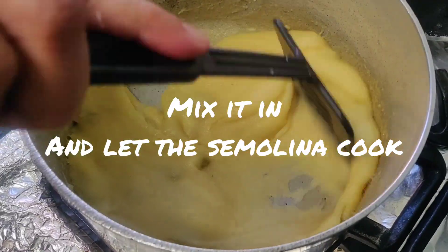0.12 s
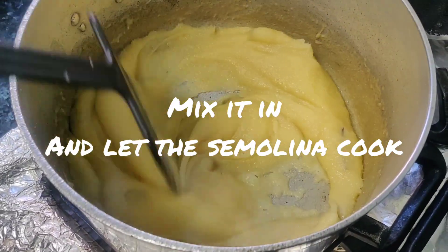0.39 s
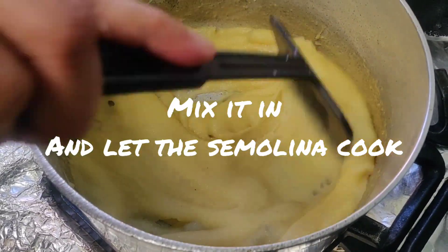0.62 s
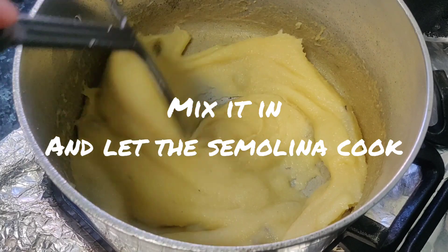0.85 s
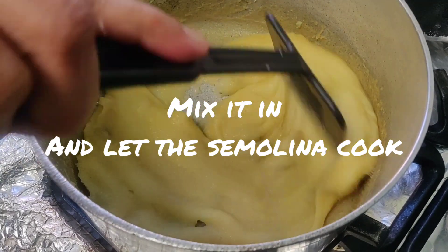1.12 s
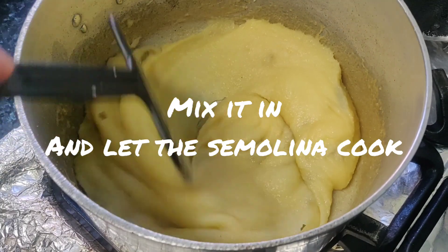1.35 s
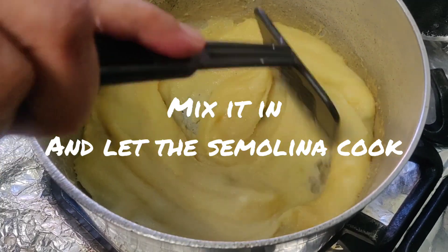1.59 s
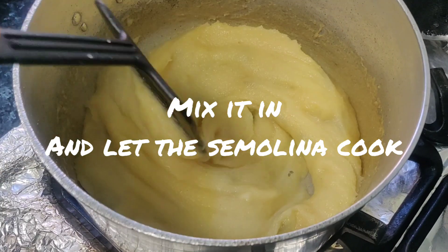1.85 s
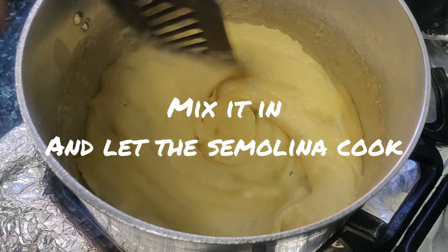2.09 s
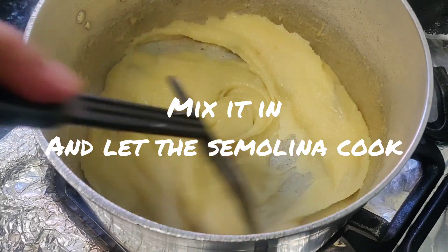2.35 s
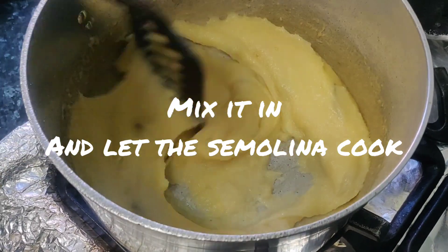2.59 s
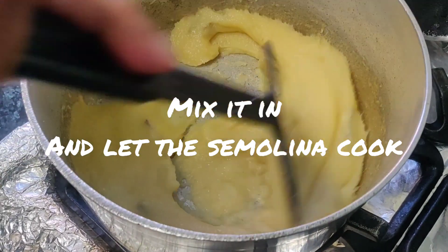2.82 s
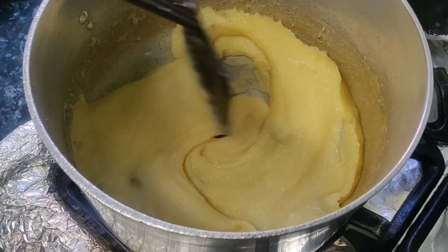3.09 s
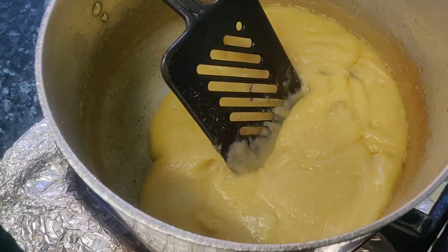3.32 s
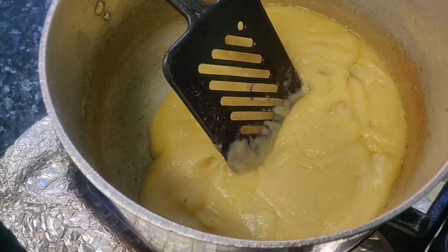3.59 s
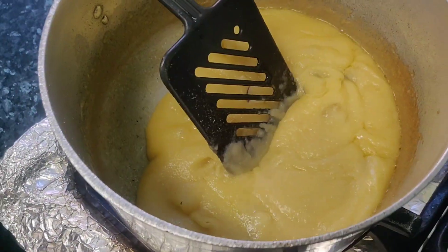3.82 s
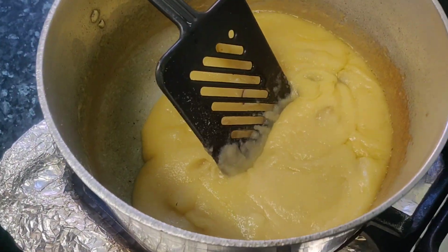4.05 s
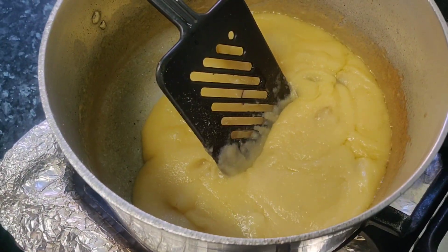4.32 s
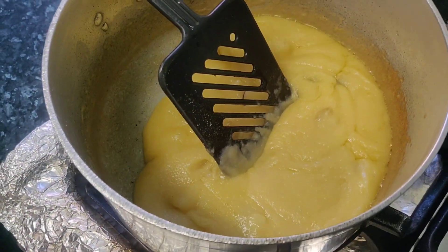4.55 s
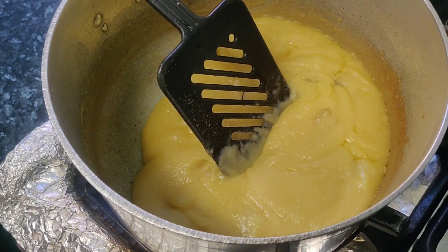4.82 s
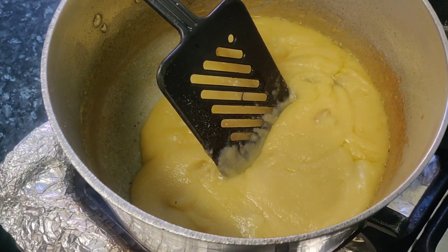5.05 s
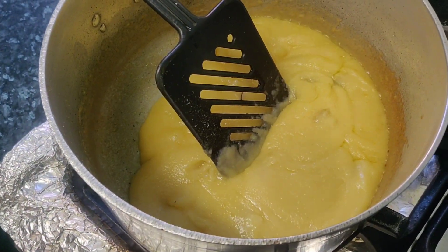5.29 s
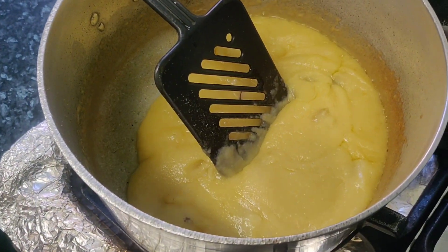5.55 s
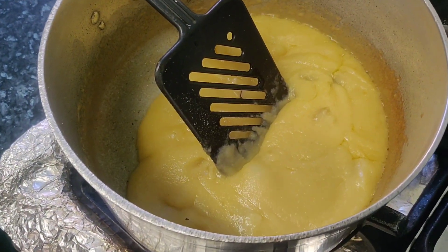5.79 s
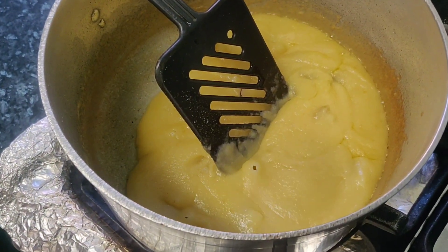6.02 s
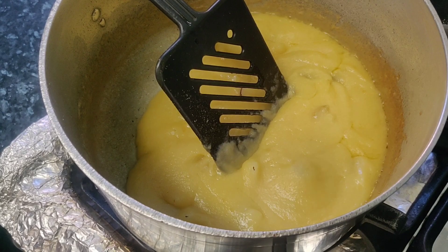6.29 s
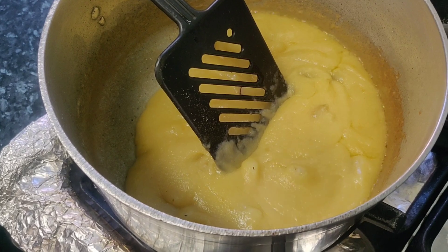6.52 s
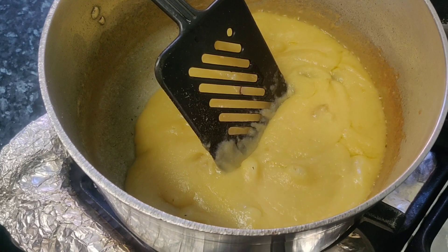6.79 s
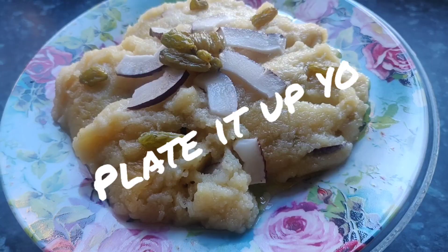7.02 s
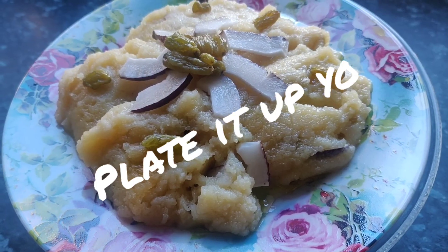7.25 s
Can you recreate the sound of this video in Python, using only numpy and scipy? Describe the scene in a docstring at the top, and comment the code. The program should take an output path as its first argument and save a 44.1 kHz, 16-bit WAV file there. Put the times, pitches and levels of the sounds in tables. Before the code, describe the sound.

A handheld phone close to a steel pot hears low, resonant burner roar, hum and crackling sizzle from the start. Spatula strokes rasp and rumble along the metal with dull, paste-damped knocks and one hard ringing hit. After a momentary break, simmering fades up without stirring: steady hiss, scattered snaps, deeper blister bursts, low flutter on the left and soft thumps. Another break leads to very faint room noise. Small dry kitchen.

```python
"""From the outset a gas burner roars over a mains hum, filtered noise and sines, while pudding hisses and spits.
A plastic spatula stirs: its knocks and stick-slip scrapes excite the modes of a steel pot.
After a brief silence the pudding simmers alone, its noise and steam jets rising from silence; bumps reach the phone.
Last comes a quiet room, low noise with faint sines, again rising from silence.
Two unlike microphone ports colour it all; in the simmer and the quiet room their offset jumps and settles."""
import sys
import numpy as np
from scipy import signal
from scipy.fft import rfft, irfft
from scipy.io import wavfile

SR = 44100
rng = np.random.default_rng(int(sys.argv[2]) if len(sys.argv) > 2 else 0)


def wav_out(sig):
    """Save sig, one row per channel (or a flat mono array), as 16-bit PCM at SR to the path in sys.argv[1]."""
    wavfile.write(sys.argv[1], SR, np.round(np.clip(np.atleast_2d(sig).T, -1, 1) * 32767).astype(np.int16))


def voltage_ratio(decibels):
    """Convert decibels (scalar or array-like) to amplitude ratios, 20 dB per decade."""
    exponent = np.asarray(decibels, float) / 20
    return 10 ** exponent


N = 325878
T = np.arange(N) / SR  # seconds
HZ = np.maximum(np.fft.rfftfreq(N, 1 / SR), 1)

# Source levels below hold before the passage fades and the colour of the ports.
# Stirring, simmer and quiet room. Each row: start in seconds, end in seconds.
PASSAGES = [(-2.5, 3.328), (3.412, 6.893), (6.97, 7.6)]
# Smooth spectrum of burner and kitchen. Each row: frequency in Hz, density in dB per Hz.
ROAR_SPECTRUM = [(25, -63), (60, -75), (130, -68.5), (250, -73.5), (420, -87), (480, -75), (700, -73.5),
                 (1000, -78), (1700, -80.5), (3000, -89), (6000, -105)]
# Resonances of pot and kitchen that the roar keeps ringing.
# Each row: frequency in Hz, width at -6 dB in Hz, density at the centre in dB per Hz.
ROAR_RESONANCES = [(149.8, 6.8, -60.5), (277, 19, -63), (325.6, 28.8, -55.5), (367.4, 15.2, -51),
                   (410.4, 36, -63), (627, 140, -75), (807, 20, -75.5), (1297, 18, -72), (1364, 120, -75),
                   (2006, 89, -74.5)]
# Mains harmonics. Each row: frequency in Hz, level in dB rms.
MAINS_HUM = [(100.2, -47), (200.4, -48.5)]
# Correlation of left and right in the roar. Each row: frequency in Hz, correlation from 0 to 1.
ROAR_CORRELATION = [(60, 0.8), (130, 0.9), (290, 0.97), (640, 0.63), (1410, 0), (3100, 0), (6820, 0),
                    (15000, 0.08)]
# Loud spits of steam. Each row: instant in seconds, peak in dB before panning and room,
# length in ms before filtering.
LOUD_SPITS = [(0.0056, -19, 2.4), (0.0753, -28, 1.4), (0.2484, -19, 0.78), (0.3739, -20, 1.1),
              (0.3776, -24, 2.4), (0.4361, -25, 1.5), (0.613, -26, 1.1), (0.64, -18, 2.5),
              (0.6595, -23, 1.5), (0.7072, -22, 2.1), (0.8321, -17, 1.2), (1.7726, -23, 1.3),
              (2.1587, -35.5, 1.4), (2.1649, -19, 1.1), (2.1752, -15.5, 1.4), (2.1816, -17.5, 0.9),
              (2.1896, -23.5, 1.2), (2.222, -25.5, 1.0), (2.1994, -21.5, 0.85), (2.2074, -20, 1.6),
              (2.2481, -22, 1.2), (2.4902, -22, 1.3), (2.6669, -22, 1.3), (2.9156, -26.5, 1.9),
              (3.1903, -20.5, 1.2), (3.2994, -29.5, 2), (3.3081, -22, 0.84), (3.6369, -23, 1.4),
              (3.6816, -28, 1.9), (4.1107, -26, 1.6), (4.1772, -28.5, 2.7), (4.2963, -14.5, 0.77),
              (4.4068, -28, 3.8), (4.5637, -21, 1.3), (4.9115, -26.5, 2.6), (5.1379, -26, 1.1),
              (5.3884, -28.5, 0.7), (5.3946, -21, 0.7), (5.4997, -26.5, 1.9), (5.6344, -37, 0.6),
              (5.8627, -28.5, 2.5), (5.8835, -21, 1.6)]
# Bigger blisters that burst with a deeper body. Each row: the same three columns as the loud spits.
BLISTERS = [(3.8535, -26.5, 3.1), (4.2165, -29.5, 1.5), (4.6651, -22.5, 1.5), (4.6731, -25, 2.4),
            (4.8968, -27.5, 1.5)]
# Spatter where the hot steel is bared. Each row: centre in seconds, level in dB before filtering,
# half length (standard deviation) in seconds.
SPATTER_SWELLS = [(.25, -39.5, 0.0072), (.378, -36, 0.0053), (.43, -35, 0.023), (.63, -40, 0.021),
                  (.84, -40.5, 0.07), (1.3, -39.5, 0.054), (1.79, -41, 0.034), (2.183, -26.5, 0.024),
                  (2.72, -40.5, 0.12), (3.2, -43, 0.087), (4.22, -38, 0.013), (4.67, -38.5, 0.01),
                  (4.91, -53, 0.022), (5.875, -48, 0.016)]
# Modes of the steel pot. Each row: frequency in Hz, relative level in dB, undamped t60 in seconds.
POT_MODES = [(463, -11, 0.1), (616, -2, 0.043), (671.3, 1, 0.05), (806, -5.5, 0.064), (880, -12.5, 0.053),
             (1247, -6.5, 0.14), (1370, -25.5, 0.061), (1744, -14, 0.22), (1898, -2.5, 0.045),
             (1948, -10.5, 0.14), (2080, -12, 0.056), (2660, -14, 0.06), (3740, -7, 0.078),
             (3940, -14.5, .1), (4104, -5, 0.045), (4870, -18.5, 0.09), (6230, -19, .06),
             (6610, -18, 0.043), (7650, -10, 0.12)]
# Knocks of the spatula. Each row: instant in seconds, peak in dB before the room,
# push length (four standard deviations) in ms, t60 in seconds that the paste under the blade allows.
KNOCKS = [(.538, -27, 2.8, 0.024), (.6383, -18, 1.05, 0.016), (1.3622, -25, 0.72, .03),
          (1.3875, -26, 0.97, .03), (1.484, -7, 0.023, 0.21), (1.4935, -21, 3.2, .04),
          (1.5605, -21, 1.5, 0.017), (1.828, -26.5, 0.77, 0.04), (2.0285, -26, 0.23, 0.28),
          (2.0425, -37, 0.9, 0.046), (2.061, -27.5, 1.4, 0.054), (2.133, -24, 3.1, .04),
          (2.4885, -25, 1.3, 0.037), (2.7195, -25.5, 0.48, 0.034), (3.1965, -26, 0.46, 0.063),
          (3.207, -25.5, 0.49, 0.048)]
# Strokes of the blade along the steel. Each row: centre in seconds, level of the rumble in dB,
# half length (standard deviation) in seconds.
STROKES = [(.584, -47, 0.18), (.91, -45, 0.059), (1.2, -46.5, 0.053), (1.524, -35.5, 0.039),
           (2.042, -35.5, 0.016), (2.07, -44, 0.013), (2.14, -40.5, 0.054), (2.418, -43, 0.015),
           (2.735, -39, 0.054), (3.225, -42, 0.025)]
# Soft bumps on the phone. Each row: instant in seconds, left amplitude, right amplitude.
PHONE_BUMPS = [(3.285, 0.039, -0.041), (4.531, 0.082, -.011), (4.655, 0.025, -0.016),
               (5.393, 0.095, 0.0092), (6.844, 0.07, -0.043)]
# Microphone offset waking up.
# Each row: start in seconds, scale of left swing, scale of right step, right settling time in seconds.
OFFSET_WAKES = [(3.629, 0.16, 0.046, 0.03), (7.151, 0.082, 0.025, 0.13)]
# Small sudden offset steps. Each row: start in seconds, left scale, right scale.
OFFSET_STEPS = [(3.632, -.015, 0), (7.1505, -.0035, 0), (7.2062, -.007, -.003)]
# Spectrum of the quiet room. Each row: frequency in Hz, density in dB per Hz.
QUIET_SPECTRUM = [(30, -76), (70, -77.5), (170, -85), (450, -86.5), (1000, -94), (1600, -96.5),
                  (3200, -100), (6000, -109), (16000, -106)]
# Faint steady tones of the quiet room. Each row: frequency in Hz, level in dB rms.
QUIET_TONES = [(166.9, -66.5), (1581, -73.5), (1857, -74.5)]
# Colour of the two ports. Each row: frequency in Hz, left gain in dB, right gain in dB.
PORT_COLOUR = [(60.7, -1.5, -4), (187, 0.45, 3.5), (378, 1.34, -1.2), (1320, -0.73, 1.5), (3300, 0.5, -1),
               (4280, 4, 4), (4800, 3.5, 3), (5280, 6.5, -0.5), (6540, 14.5, 6.5), (7510, 4.5, 0.5),
               (8330, -5.5, 8.5), (9300, -20, 6), (9920, -46.5, -12.5), (10400, -50, -39),
               (10600, -31.5, -19), (12400, -19, -7.5), (13700, -16, -7), (15500, -8.5, -4.5)]

STIR_END = PASSAGES[0][1]
SIMMER_START, SIMMER_END = PASSAGES[1]


def along(table, column=1):
    """Spectral interpolation: reads a table column on a log-frequency axis."""
    rows = np.array(table)
    return np.interp(np.log(HZ), np.log(rows[:, 0]), rows[:, column])


def noise(gain, correlation):
    """Partial correlation: stereo noise of a given gain per root Hz from a shared and an opposed part."""
    mid, side = rfft(rng.standard_normal((2, N))) * gain * np.sqrt(SR / 2)
    mid = mid * np.sqrt((1 + correlation) / 2)
    side = side * np.sqrt((1 - correlation) / 2)
    return irfft(np.array([mid + side, mid - side]), N)


def tones(table):
    """Superposition: steady sines add, from rows of Hz and dB rms."""
    return sum(voltage_ratio(db) * np.sqrt(2) * np.sin(2 * np.pi * hz * T) for hz, db in table)


def band(x, lo_hz, hi_hz):
    """Band limitation by a causal Butterworth filter."""
    return signal.sosfilt(signal.butter(2, [lo_hz, hi_hz], "bandpass", fs=SR, output="sos"), x)


def walk(rate_hz):
    """Slow random fluctuation: low-passed noise of standard deviation 1."""
    x = irfft(rfft(rng.standard_normal(N)) / (1 + (HZ / rate_hz) ** 2), N)
    return x / x.std()


def crackle(rate_hz, spread_db):
    """Random impulses: most clicks small, a few large, their size bounded; rms 1."""
    size = np.minimum(rng.exponential(size=N), 4)
    struck = rng.random(N) < rate_hz / SR
    x = struck * rng.standard_normal(N) * voltage_ratio(spread_db * size)
    return x / x.std()


def humps(table):
    """Gaussian envelopes: swells from rows of centre, dB and half length."""
    return sum(voltage_ratio(db) * np.exp(-.5 * ((T - s) / half) ** 2) for s, db, half in table)


def decay(t, t60):
    """Exponential damping: the amplitude falls by 60 dB in t60 seconds."""
    return np.exp(-np.log(1000) * t / t60)


def kitchen(x, t60, wet_db):
    """Reverberation: direct sound, a little late on the right, plus an unrelated decaying tail in each ear."""
    size, right_lag = 12000, 3  # samples
    tail = rng.standard_normal((2, size)) * decay(T[:size], t60)
    tail = voltage_ratio(wet_db) * tail / np.sqrt(np.sum(tail ** 2, axis=1, keepdims=True))
    x = x * np.ones((2, 1))
    direct = np.array([x[0], np.roll(x[1], right_lag)])
    return direct + signal.fftconvolve(x, tail, axes=1)[:, :N]


def fade(passage, rise_s=0.59, bend=0.77):
    """Exponential approach: the gain rises slowly from the start and is cut quickly at the end."""
    start, end = passage
    rise = (1 - np.exp(-np.clip(T - start, 0, None) / rise_s)) ** bend
    return rise * np.clip((end - T) / 0.008 + 1, 0, 1) ** 2


def stove():
    """Resonant filtering: turbulent roar excites narrow resonances, over two mains harmonics."""
    power = voltage_ratio(along(ROAR_SPECTRUM)) ** 2
    for hz, width, db in ROAR_RESONANCES:
        power += voltage_ratio(db) ** 2 / (1 + (2 * (HZ - hz) / width) ** 2) ** 2
    roar = noise(np.sqrt(power), np.clip(along(ROAR_CORRELATION), 0, 1))
    return roar * voltage_ratio(.8 * walk(7.)) + tones(MAINS_HUM)


def pudding_hiss():
    """Fluctuating noise: fine hiss joined by fizzing grains, growing a little as the simmer thickens."""
    stirred_db, simmer_db, growth_db_per_s = -41.5, -43, 0.09  # before filtering
    simmer_level = simmer_db + growth_db_per_s * (T - SIMMER_START)
    level_db = np.where(T < SIMMER_START, stirred_db, simmer_level)
    fizz = np.array([crackle(1000.0, 4.9), crackle(1300.0, 1.5)])
    hiss = rng.standard_normal((2, N)) * voltage_ratio(1.58 * walk(17.0)) + voltage_ratio(-5.5) * fizz
    return band(hiss * voltage_ratio(level_db), 1400.0, 18000.)


def arm_shake():
    """Vibration transfer: a deep, wavering shake lasts while the arm stirs."""
    shake = voltage_ratio(-19.0) * band(rng.standard_normal(N), 8.2, 49.0)
    return shake * voltage_ratio(3.1 * walk(3.)) * (T < STIR_END)


def steam_spits():
    """Impulsive radiation: the skin snaps amid a brief jet of steam, heard partly differently at each port."""
    # small spits fall at random throughout stirring and simmer
    count, small_db, spread_db, small_ms = 110, -39, 1.5, 1.1
    when, size, long = rng.random((count, 3)).T
    small = zip(when * SIMMER_END, small_db - spread_db * np.log(size), small_ms * (.5 + long))
    instant, peak_db, ms = np.array(list(BLISTERS) + list(LOUD_SPITS) + list(small)).T
    lead = 128  # samples ahead of the snap
    puff = rng.standard_normal((len(instant), 2, 4 * lead))
    # left minus right: mostly left while stirred, right while simmering, each a little elsewhere in the pot
    pan_db = np.where(instant < SIMMER_START, 8, -8) + 2.5 * puff[:, 0, 0]
    # time in half lengths of each jet
    u = (T[:puff.shape[2]] - T[lead]) * 2000 / np.maximum(ms, .2)[:, None, None]
    jets = (puff + 0.25 * puff[:, :1]) * np.exp(-u ** 2)
    jets[:, :, lead] += voltage_ratio(7.)  # the snap
    deep = band(jets[:len(BLISTERS)], 1500.0, 8200.0)
    bright = band(band(jets[len(BLISTERS):], 5900.0, 13000.), 3800.0, 18000.)
    jets = np.concatenate([deep, bright])
    jets = jets / np.abs(jets).max(axis=2, keepdims=True)
    spits = np.zeros((2, N))
    for s, db, pan, jet in zip(instant, peak_db, pan_db, jets):
        i = max(int(s * SR) - lead, 0)
        spits[:, i:i + jet.shape[1]] += jet * voltage_ratio(db + np.array([[pan], [-pan]]) / 2)
    return kitchen(spits, .03, -8.)


def spatter():
    """Dense random impulses: crackle and noise swell where the hot steel is bared."""
    grains = crackle(1800.0, 4.5) + 0.6 * rng.standard_normal((2, N))
    grains = band(grains * humps(SPATTER_SWELLS), 3700.0, 14000.0)
    return band(kitchen(grains, 0.017, -2.), 2300., 18000.0)


def pot_ring():
    """Modal superposition: damped sines ring, with a rattle of noise between them."""
    size = 12000
    t = T[:size]
    ring = np.zeros(size)
    for k, (hz, db, t60) in enumerate(POT_MODES):
        # neighbouring modes start in opposite sense
        ring += (-1) ** k * voltage_ratio(db) * np.sin(2 * np.pi * hz * t) * decay(t, t60)
    ring += voltage_ratio(-3.0) * band(rng.standard_normal(size), 450.0, 2600.0) * decay(t, 0.26)
    ring += voltage_ratio(-10.5) * band(rng.standard_normal(size), 5000.0, 7500.0) * decay(t, 0.029)
    # crack of the edge
    ring += voltage_ratio(-1.0) * band(rng.standard_normal(size), 820.0, 5300.0) * decay(t, 0.029)
    return ring * (1 - np.exp(-t / 0.00052))  # the whole pot takes a moment to join in


def knocks(ring):
    """Impact excitation: a longer, softer push excites fewer high modes, and paste damps the ring."""
    blows = np.zeros(N)
    t = T[:len(ring)]
    push_t = T[:2048]
    for instant, peak_db, ms, paste_t60 in KNOCKS:
        push = np.exp(-.5 * ((push_t * 1000 - ms) / (ms / 4)) ** 2)
        # the blade chatters for a few ms, so each blow weighs the modes afresh
        chatter = 0.035 * rng.standard_normal(len(push_t)) * np.exp(-push_t / 0.0012)
        force = signal.fftconvolve(push, np.append(1, chatter))
        damped = ring * decay(t, max(paste_t60, .005))
        knock = signal.fftconvolve(damped, force)[:len(ring)]
        knock = voltage_ratio(peak_db) * knock / np.abs(knock).max()
        i = int((instant - ms / 1000) * SR)
        blows[i:i + len(ring)] += knock[:N - i]
    return blows


def scrapes(ring):
    """Stick-slip friction: the paste-laden pot rumbles low while the bare blade edge rasps higher."""
    slips = crackle(1100., 2.)
    ringing = signal.fftconvolve(slips, ring)[:N]
    rumble = band(slips + voltage_ratio(-23.0) * ringing, 360.0, 1000.0)
    rasp = band(band(slips, 900.0, 2900.0), 800., 3100.)
    friction = rumble / rumble.std() + voltage_ratio(-4.5) * rasp / rasp.std()
    return friction * humps(STROKES)


def spatula():
    """Common resonator: blows and scraping excite the same pot modes and share one room."""
    ring = pot_ring()
    return kitchen(knocks(ring) + scrapes(ring), 0.069, -5.5)


def phone_bumps():
    """Mechanical rebound: each soft bump is a pressure pulse followed by a broader opposite one."""
    out = np.zeros((2, N))
    for s, left, right in PHONE_BUMPS:
        u = (T - s) * 1000 / 5.5  # in half lengths of 5.5 ms
        out += np.array([[left], [right]]) * (np.exp(-u ** 2) - 0.55 * np.exp(-(u - 2) ** 2 / 2))
    return out


def left_flutter():
    """Low-frequency modulation: an uneven flutter on the left port fades through the simmer."""
    flutter = voltage_ratio(-25.5) * band(rng.standard_normal(N), 21.0, 53.0) * voltage_ratio(10.0 * walk(9.1))
    flutter = flutter * (T > SIMMER_START) * voltage_ratio(-1.6 * (T - SIMMER_START))
    return np.array([flutter, np.zeros(N)])


def offset():
    """Transient response: the right offset steps and sinks back, the left follows late in a slow damped swing."""
    out = np.zeros((2, N))
    for s, swing, step, settle in OFFSET_WAKES:
        t = np.clip(T - s, 0, None)
        late = np.clip(T - s - .014, 0, None)
        swing_envelope = (1 - np.exp(-late / 0.054)) * np.exp(-late / .5)
        out[0] += swing * swing_envelope * np.cos(2 * np.pi * late / 1.57)
        sinking = 0.9 * np.exp(-t / settle) - 0.14 * np.exp(-t / 1.0)
        out[1] += step * (1 - np.exp(-t / 0.00004)) * sinking
    for s, left, right in OFFSET_STEPS:
        jump = np.clip((T - s) / .0002, 0, 1) * np.exp(-np.clip(T - s, 0, None) / .04)
        out += np.array([[left], [right]]) * jump
    return out * ((T < SIMMER_END) | (T > OFFSET_WAKES[1][0]))


def quiet_room():
    """Background noise: a weakly correlated noise floor with faint steady tones."""
    return noise(voltage_ratio(along(QUIET_SPECTRUM)), 0.16) + tones(QUIET_TONES)


def scene():
    """Superposition of sources: stirring, then simmering, then the quiet room, each under its own fade."""
    pudding = pudding_hiss() + steam_spits() + spatter()
    handling = arm_shake() + phone_bumps() + left_flutter()
    cooking = stove() + pudding + spatula() + handling
    cooking = cooking * (fade(PASSAGES[0]) + fade(PASSAGES[1]))
    return cooking + quiet_room() * fade(PASSAGES[2])


def top_cut(x):
    """Nothing passes above the cut-off."""
    return signal.sosfilt(signal.butter(12, 17030, fs=SR, output="sos"), x)


def record(dry):
    """Linear filtering: each port colours the sound its own way, the top is cut, and the offset adds."""
    colour = voltage_ratio(np.array([along(PORT_COLOUR, 1), along(PORT_COLOUR, 2)]))
    ports = colour * (HZ < 15950)
    mix = irfft(rfft(dry) * ports, N) + offset()
    return top_cut(mix)


dry = scene()
out = record(dry)
wav_out(out)
```